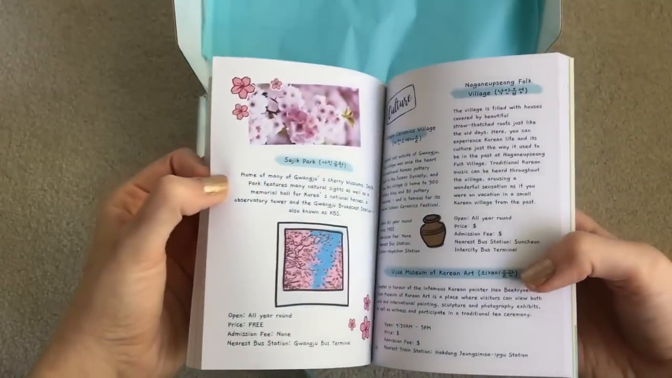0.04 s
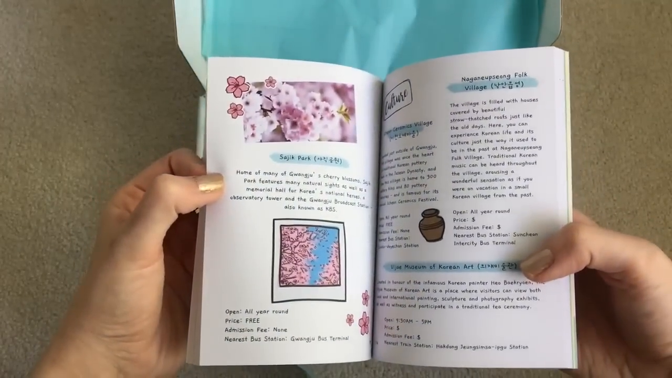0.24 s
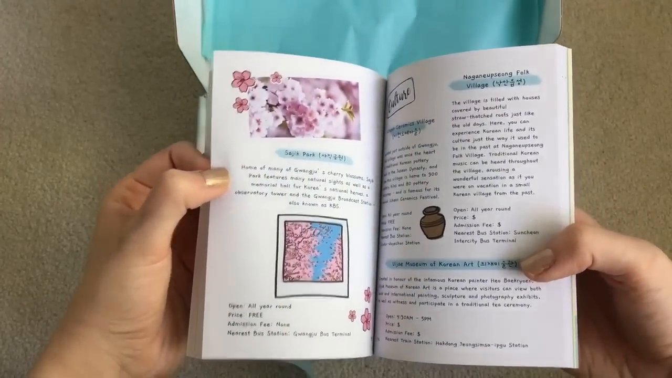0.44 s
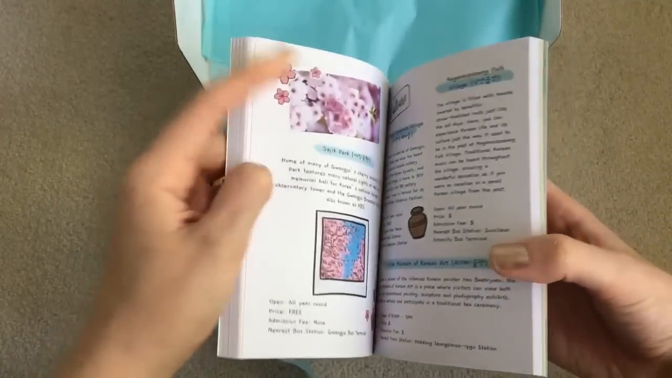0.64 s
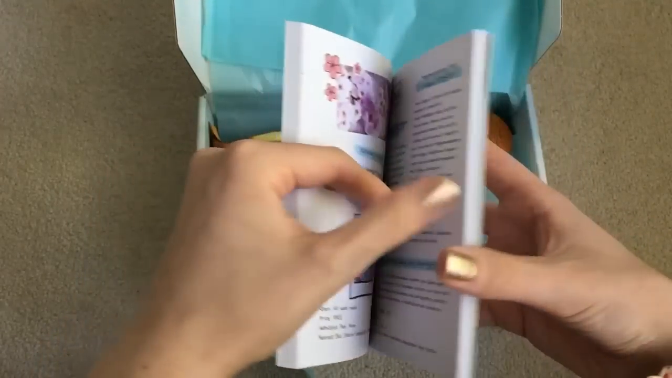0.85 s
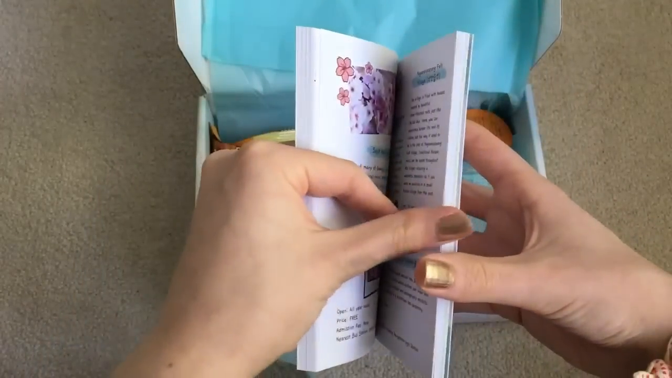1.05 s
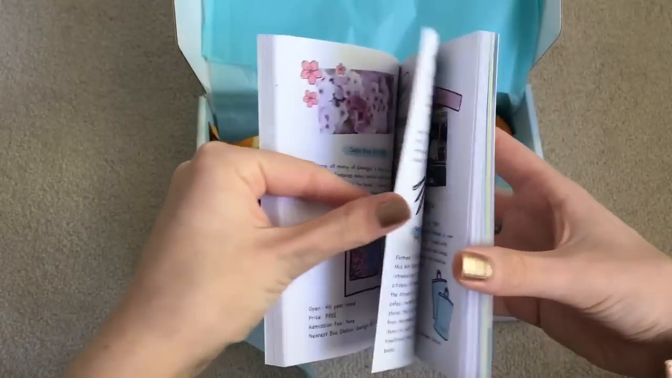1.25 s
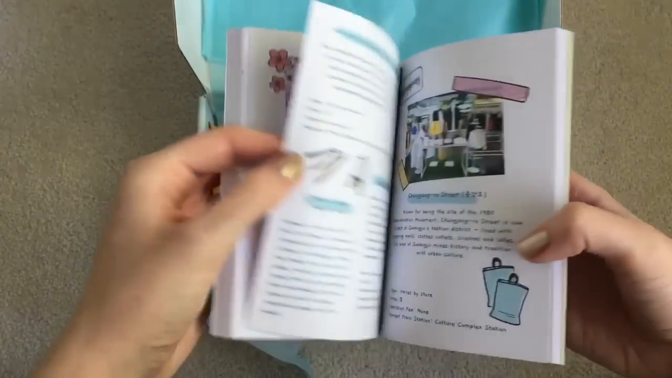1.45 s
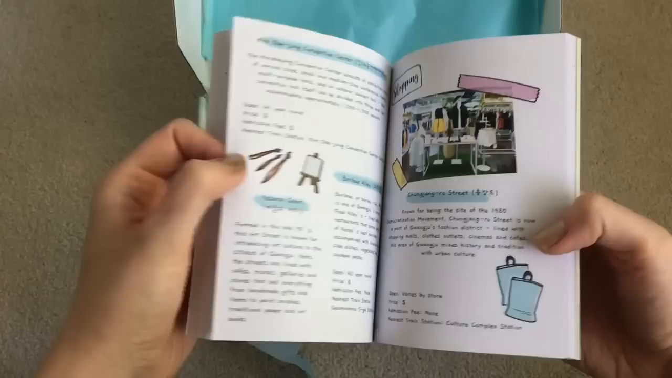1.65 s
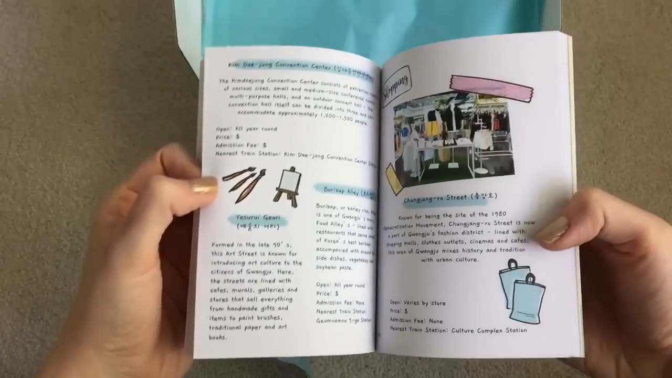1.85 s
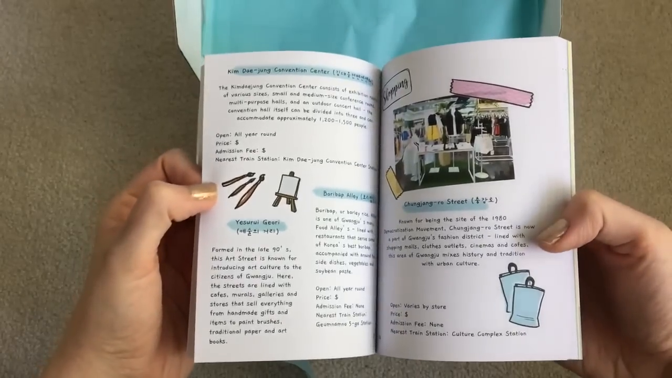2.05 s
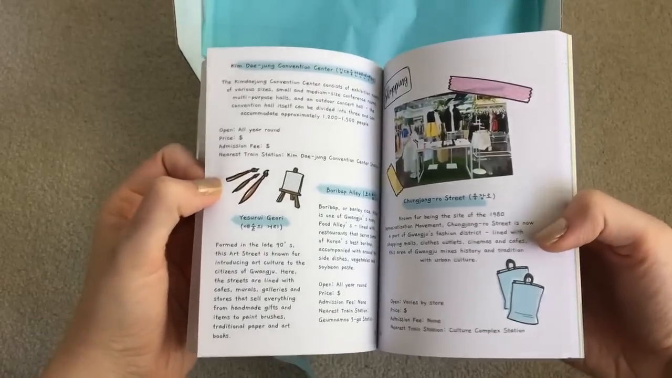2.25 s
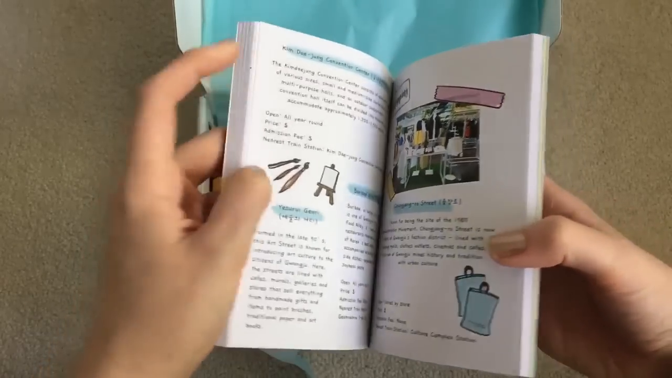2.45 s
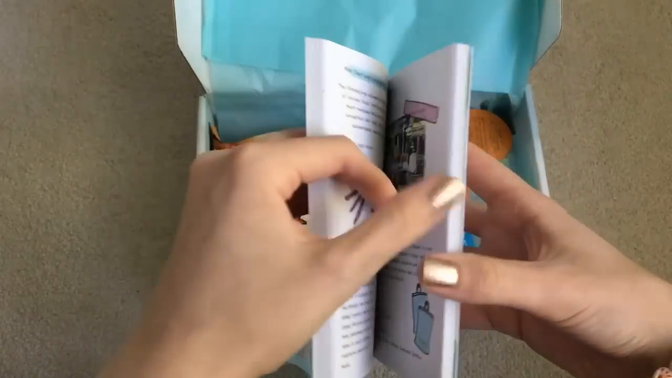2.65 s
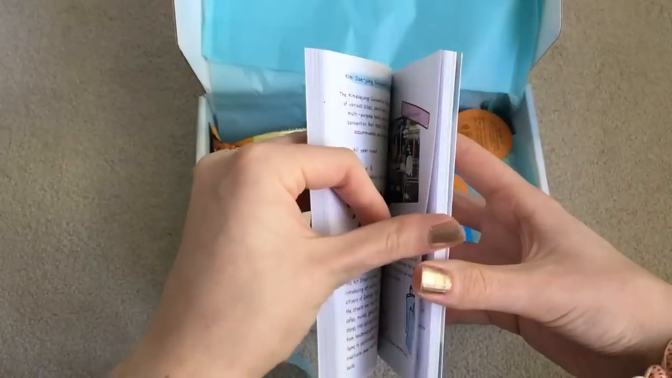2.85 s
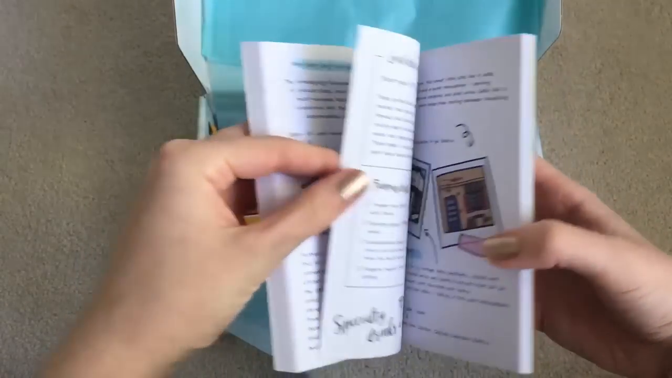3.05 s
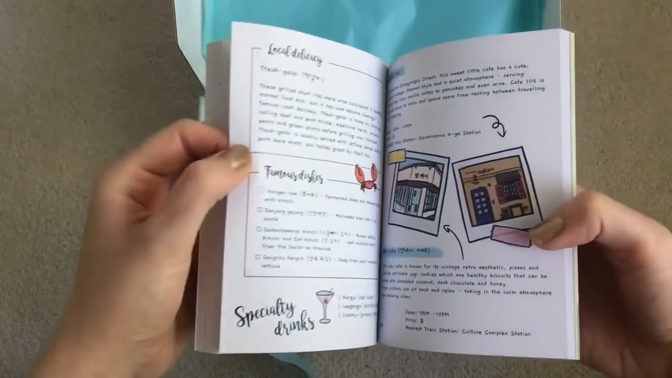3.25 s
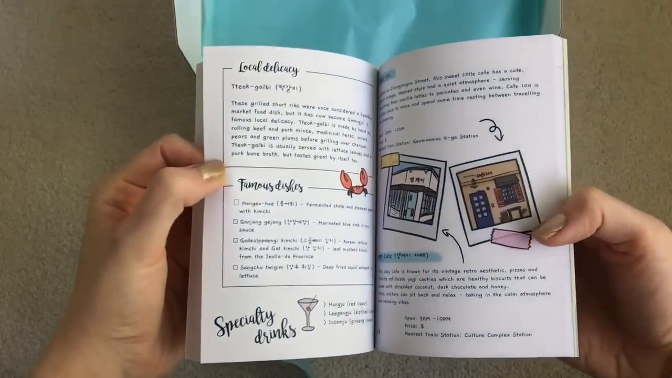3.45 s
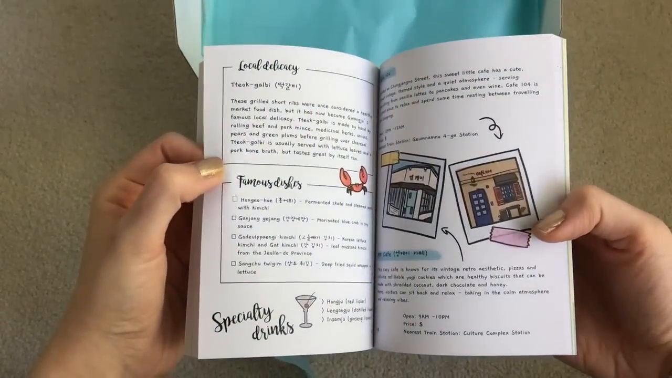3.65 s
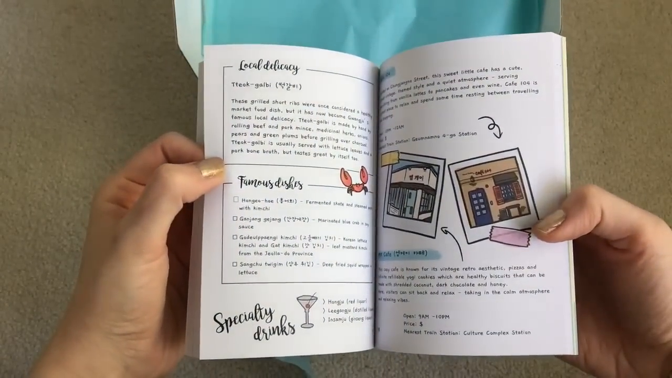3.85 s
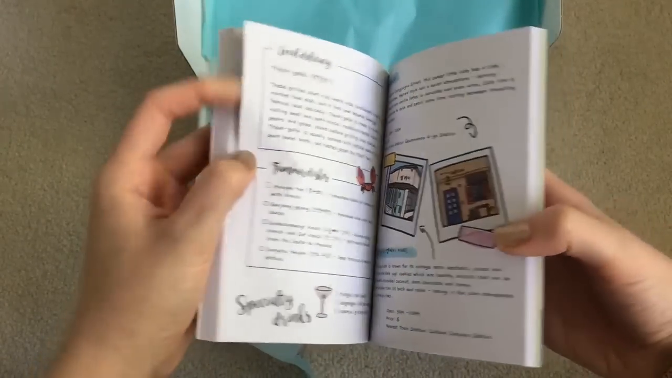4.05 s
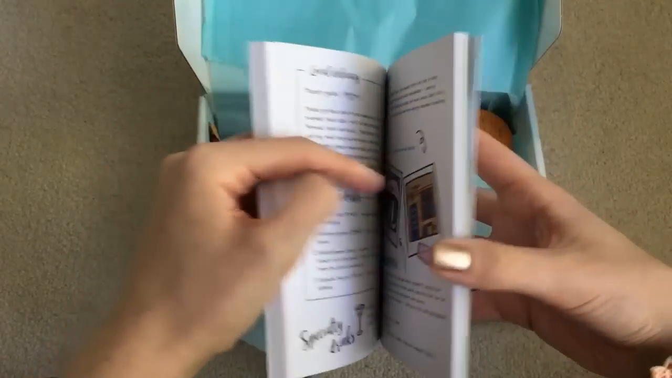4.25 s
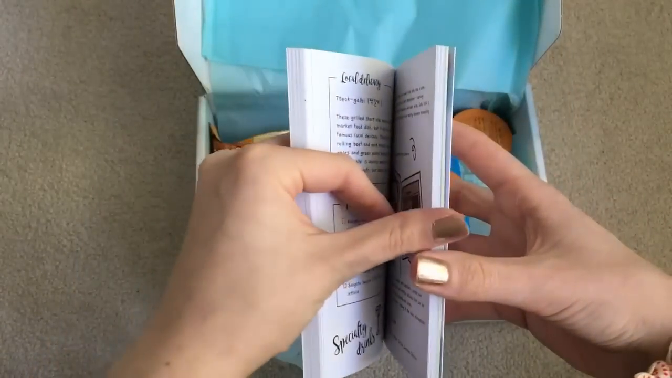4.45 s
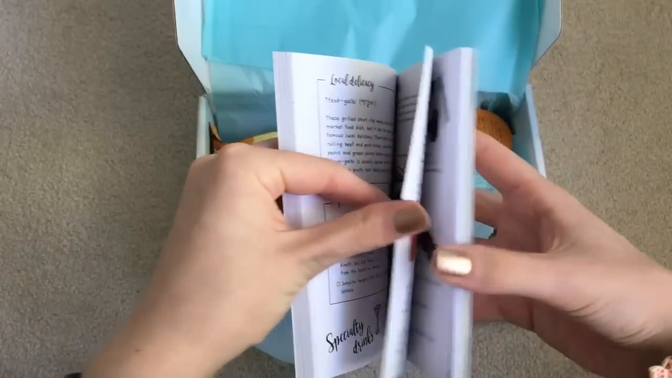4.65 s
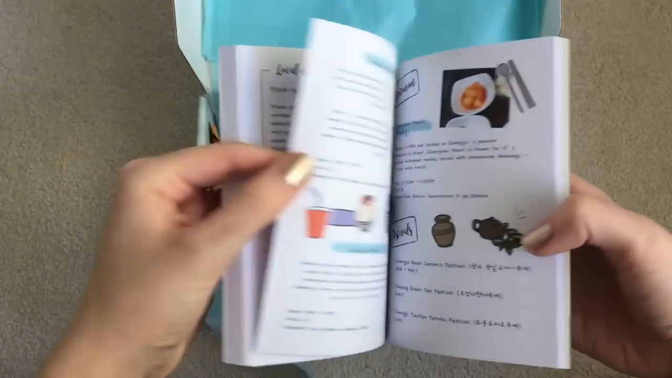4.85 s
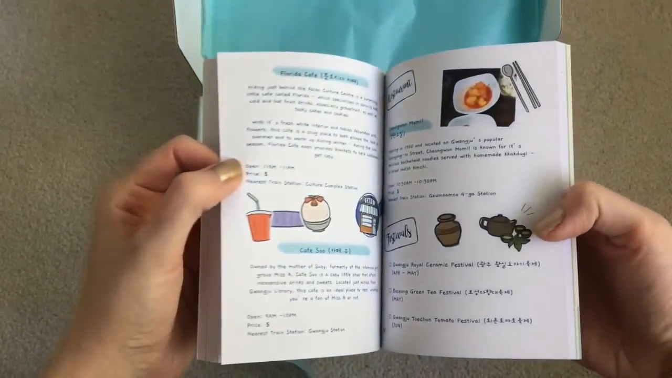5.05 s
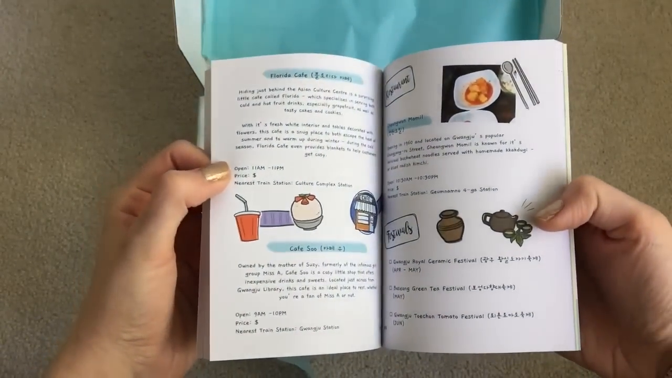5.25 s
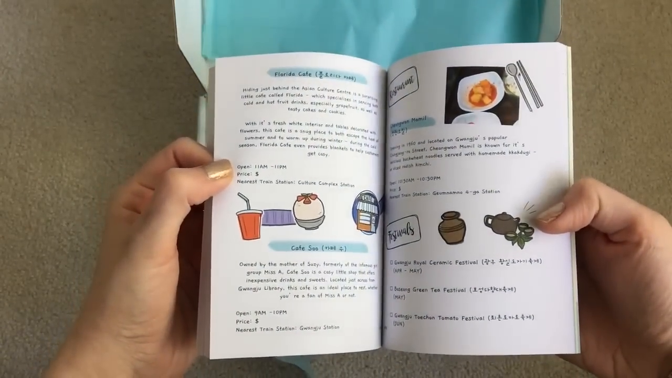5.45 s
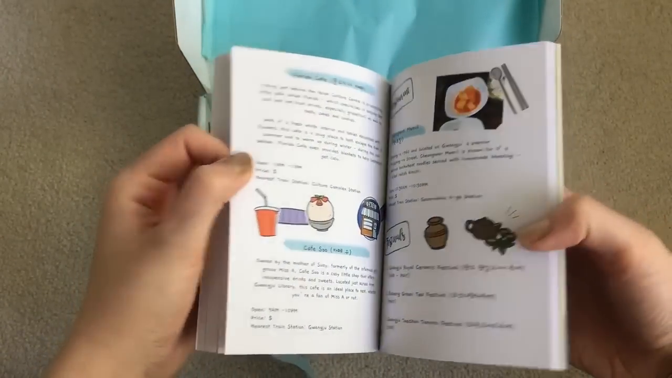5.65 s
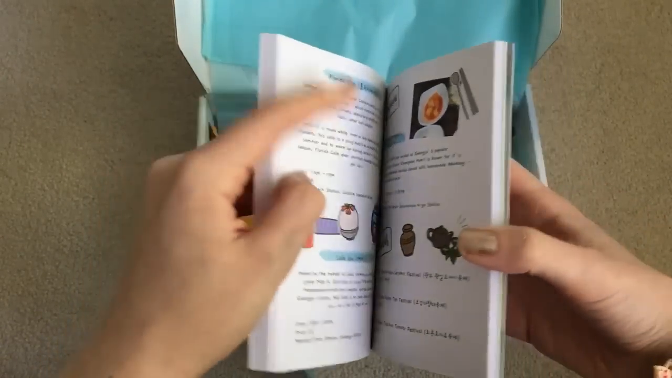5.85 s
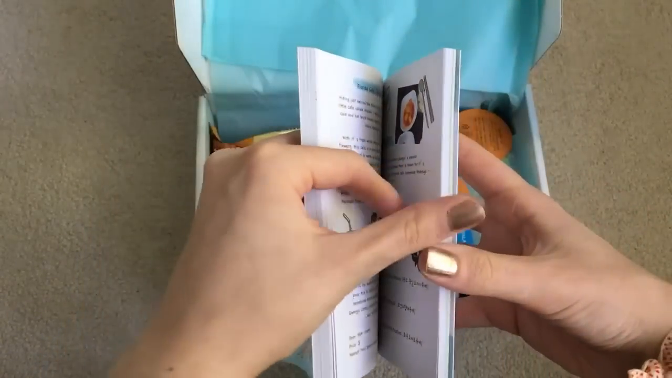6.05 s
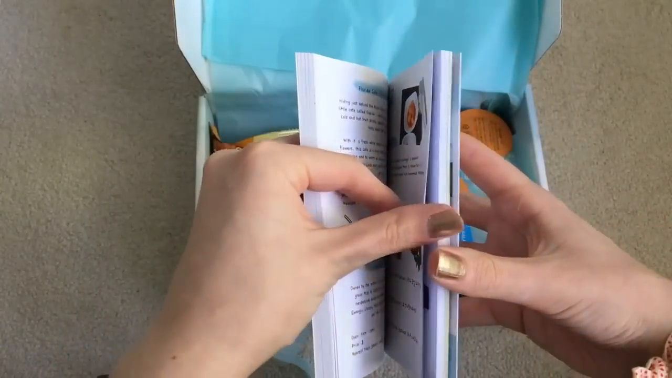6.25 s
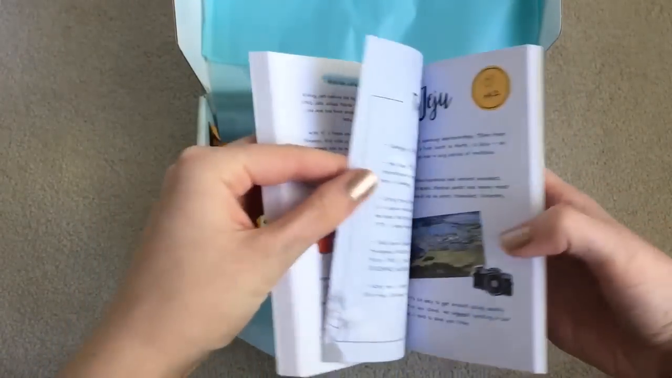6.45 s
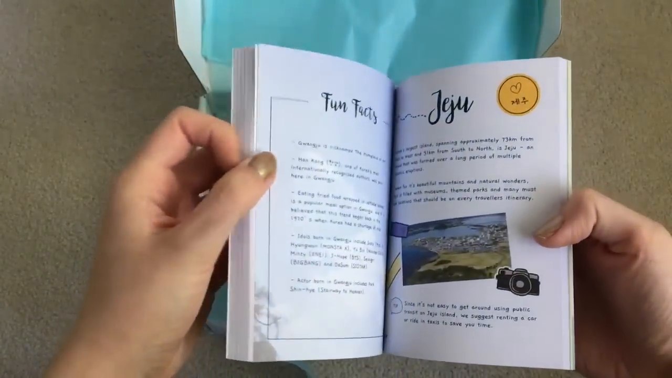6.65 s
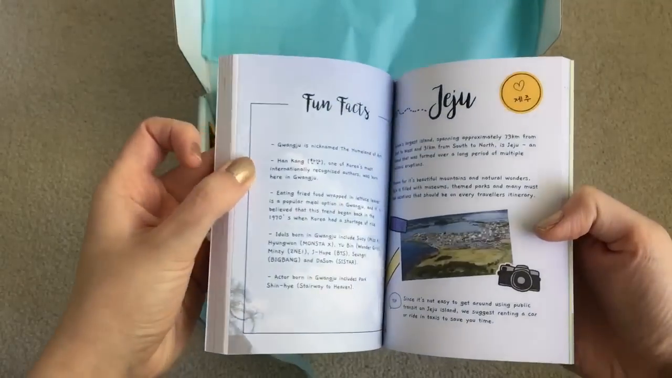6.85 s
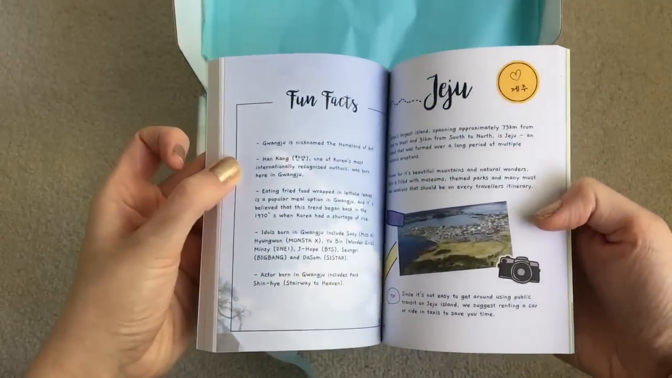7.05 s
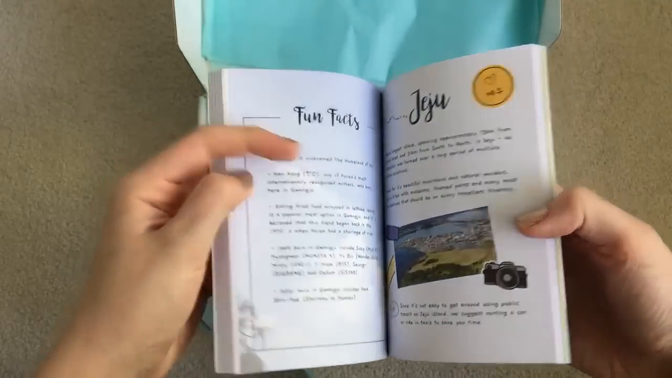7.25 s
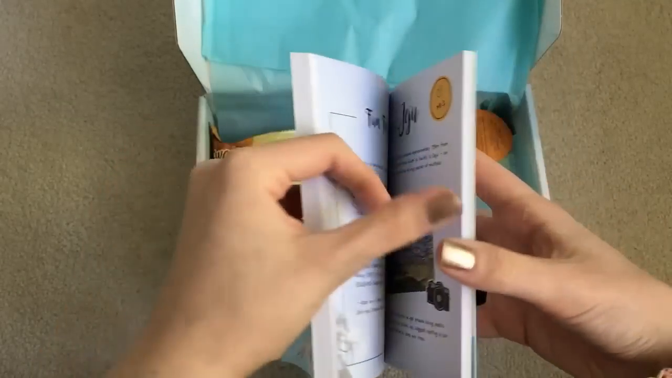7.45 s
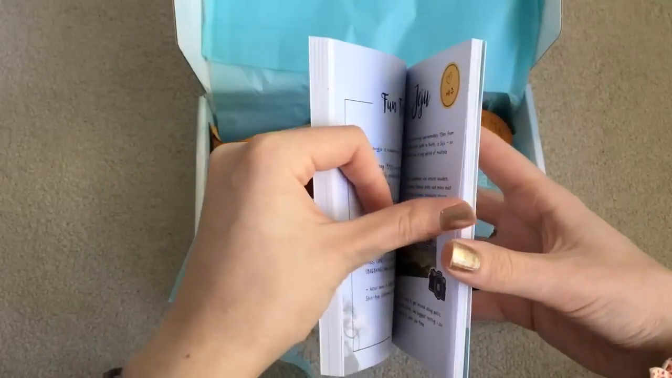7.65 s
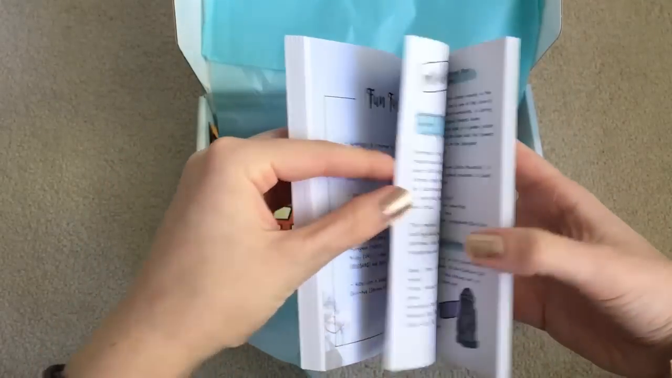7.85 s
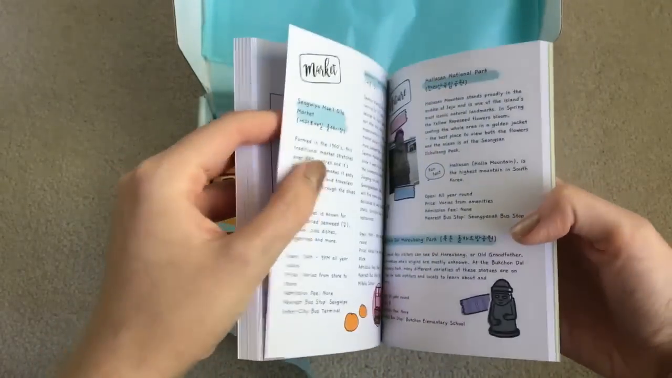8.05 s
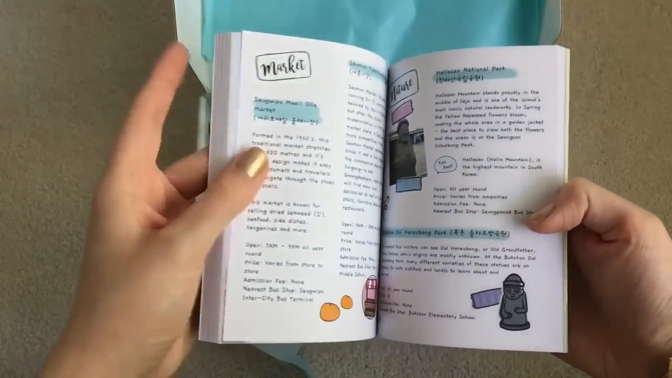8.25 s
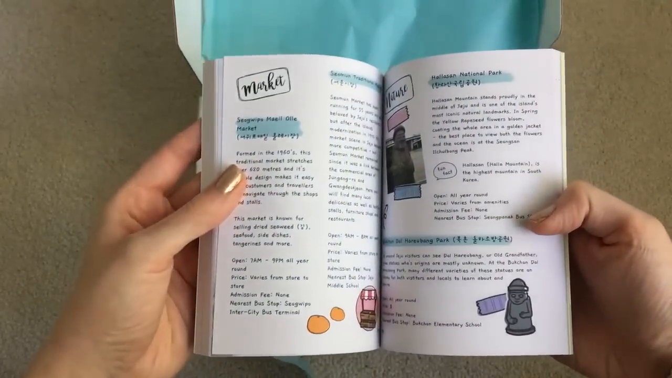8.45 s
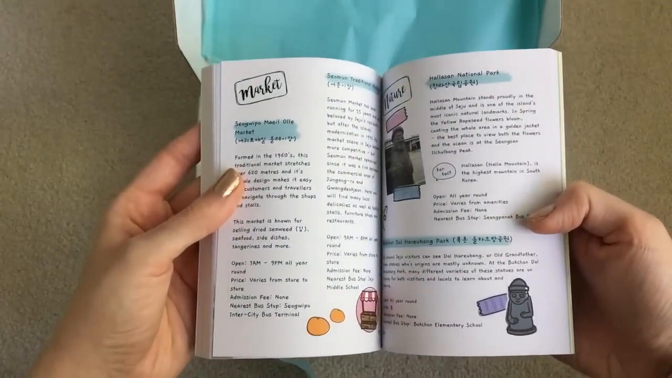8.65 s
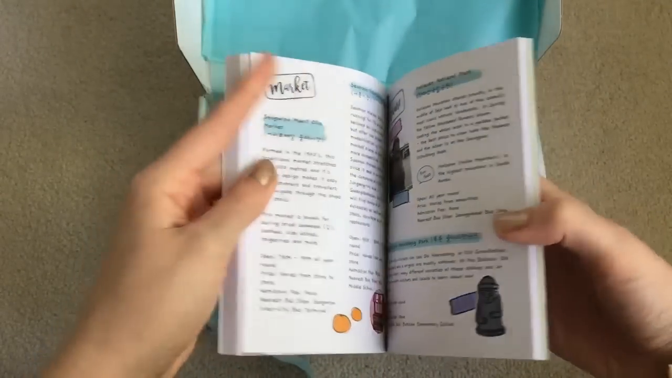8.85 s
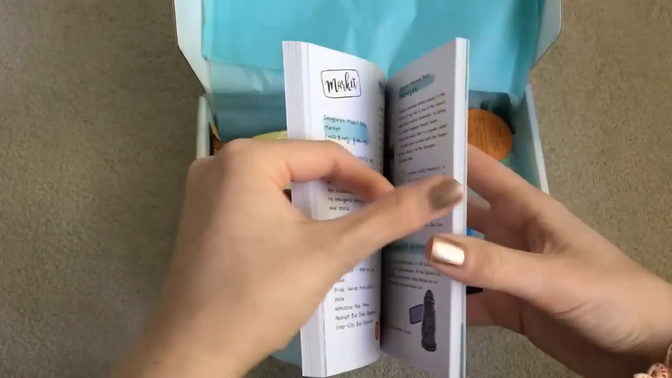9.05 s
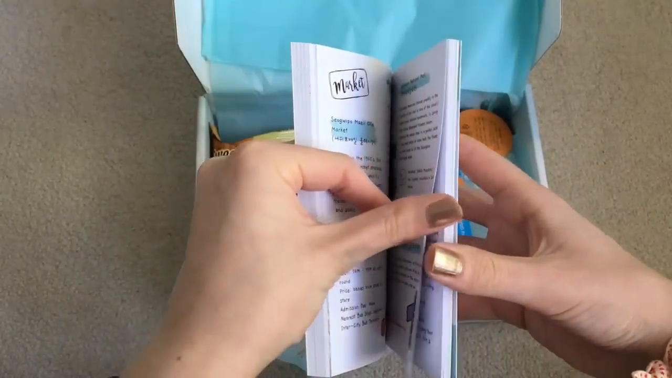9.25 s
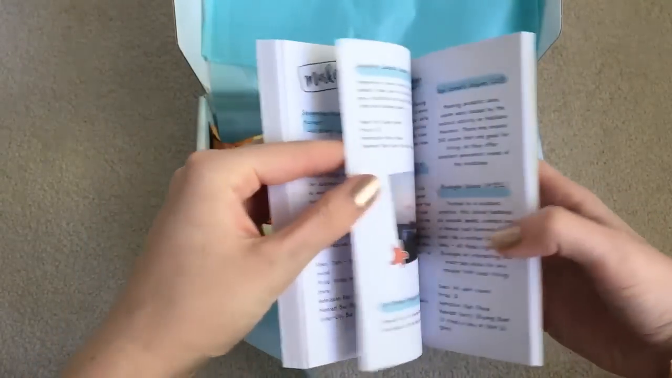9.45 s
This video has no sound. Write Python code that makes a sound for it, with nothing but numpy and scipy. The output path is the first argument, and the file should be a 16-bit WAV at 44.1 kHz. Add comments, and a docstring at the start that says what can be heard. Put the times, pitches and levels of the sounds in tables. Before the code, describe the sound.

In a quiet furnished room, hands flip through a small paperback close to the microphone. Every second or two a thumb slides off the page edges with a short rising scrape, a sheet snaps loose, then rustles down. Tiny crease ticks, soft fingertip pats and dull book thumps fill in. A muffled low swell passes midway, and the faint low hum grows late on.

```python
"""Room tone and a low hum are present from the start; beating sine lines make the hum.
From 0.6 s a thumb slides off a small paperback's pages and sheets drag, by stick-slip friction noise.
Between slides freed sheets snap as damped resonators, creases tick as impulses, the book thumps by its modes.
Near 4.4 s a muffled swell of filtered noise throbs; near 8 s strong snaps sound while the hum is at its fullest.
Light handling fills the gaps, and a short decaying noise tail gives the reverberation."""
import sys
import numpy as np
from scipy import signal
from scipy.fft import rfft, irfft
from scipy.io import wavfile
from scipy.ndimage import map_coordinates

SR = 44100
rng = np.random.default_rng(int(sys.argv[2]) if len(sys.argv) > 2 else 0)


def dump(signal):
    """Clip the signal to [-1, 1] and save it as 16-bit WAV at the path in sys.argv[1]."""
    limited = np.clip(np.atleast_2d(signal).T, -1, 1)
    pcm = np.round(limited * 32767).astype(np.int16)
    wavfile.write(sys.argv[1], SR, pcm)


N = 419391  # length in samples


def undb(db):
    """Level law: amplitude gain is 10 to the power dB/20."""
    return 10 ** (np.asarray(db) / 20)


def unit(x):
    """Normalisation of the mean square: scale to rms 1."""
    return x / np.sqrt(np.mean(x ** 2) + 1e-20)


def curve(rows):
    """Linear interpolation between (t/s, value) rows."""
    return np.interp(np.arange(N) / SR, *np.transpose(rows))


def walk(rate):
    """Slow random modulation: Gaussian knots, rate per second, joined by lines to a spread near 1."""
    knots = rng.standard_normal(4000)
    return 1.206 * np.interp(np.arange(N) / SR * rate, np.arange(len(knots)), knots)


def colour(x, points):
    """Minimum-phase filtering: the folded cepstrum gives a causal response with the (f/Hz, level/dB) spectrum."""
    size = 2 ** 13
    hz, db = np.transpose(points)
    bins_hz = np.arange(size // 2 + 1) * SR / size
    log_gain = np.log(undb(np.interp(np.log(bins_hz + 1), np.log(hz), db)))
    cepstrum = irfft(log_gain)[:size // 2]
    cepstrum[1:] *= 2
    response = irfft(np.exp(rfft(cepstrum, size)))
    return signal.fftconvolve(x, response)[:len(x)]


def band(x, hz, kind, order=3):
    """Band limiting by a maximally flat (Butterworth) filter."""
    sos = signal.butter(order, np.minimum(hz, SR / 2 - 1), kind, fs=SR, output="sos")
    return signal.sosfilt(sos, x)


def resonate(x, hz, width_hz):
    """Damped resonance: a second-order peak whose quality factor is hz / width_hz."""
    return signal.lfilter(*signal.iirpeak(hz, hz / width_hz, fs=SR), x)


def add(out, s, sound):
    """Superposition: mix a sound in at time s."""
    i = int(s * SR)
    out[i:i + len(sound)] += sound[:N - i]


# spectrum of the room tone: (f/Hz, relative level/dB)
ROOM_TONE = [(12, -46), (20, -10.5), (36, -4.5), (60, -3), (216, -22), (367, -22), (558, -30), (780, -30),
             (1060, -31.5), (1480, -33.5), (4810, -40), (16000, -43)]


def room_tone(level_db=-55.76):
    """Stationary broadband noise: white noise shaped by the spectrum of the room."""
    return undb(level_db) * unit(colour(rng.standard_normal(N), ROOM_TONE))


# lines of the low hum: (f/Hz, rms level/dB before HUM_LEVEL is added)
HUM = [(45.2, -71.5), (48.4, -71), (57.5, -73), (85, -69.5)]
# strength of the hum over time: (t/s, gain/dB)
HUM_LEVEL = [(0, 0), (2.5, 3), (7.2, 8), (7.7, 12.5), (8.8, 11.5), (9.5, 1.5)]


def hum(waver_rad=0.97):
    """Beating: neighbouring sine lines with wandering phases interfere."""
    t = np.arange(N) / SR
    lines = 0
    for hz, db in HUM:
        phase = 2 * np.pi * hz * t + waver_rad * walk(6.5)
        lines = lines + undb(db) * np.sqrt(2) * np.sin(phase)
    return lines * undb(curve(HUM_LEVEL))


# hollow resonances within the swell: (f/Hz, width/Hz, relative level/dB)
HOLLOW = [(264.7, 22, -3.5), (360, 20, -4)]
# spectrum of the muffled part: (f/Hz, relative level/dB)
MUFFLED = [(90, -6), (155, -3.5), (215, -4), (300, -4), (450, -6), (600, -24.5), (1200, -33.5)]
# rise and fall of the swell: (t/s, gain/dB)
SWELL = [(3.95, -86), (4.22, -63), (4.38, -55), (4.6, -55), (4.85, -60.5), (5.2, -78.5)]


def muffled_swell(muffled_db=-3):
    """Amplitude-modulated narrow-band noise: two resonances throb over muffled low noise."""
    hollow = 0
    for hz, width_hz, db in HOLLOW:
        throb = resonate(rng.standard_normal(N), hz, width_hz) * undb(3 * walk(18))
        hollow = hollow + undb(db) * unit(throb)
    muffled = undb(muffled_db) * unit(colour(rng.standard_normal(N), MUFFLED))
    return undb(curve(SWELL)) * (hollow + muffled)


def reflections(x, wet_db=-19, t60_s=0.33, damp_hz=5000):
    """Reverberation: a small furnished room answers with a dull, exponentially decaying tail."""
    t = np.arange(SR // 2) / SR
    dull = band(rng.standard_normal(len(t)), damp_hz, "lowpass", order=1)
    tail = dull * undb(-60 * t / t60_s) * (t > .004)
    return undb(wet_db) * signal.fftconvolve(x, tail / np.linalg.norm(tail))[:N]


# modes of the held book: (f/Hz before the pitch ratio, relative level/dB, decay/s)
BOOK = [(81.6, -6.5, 0.022), (143.8, 1, 0.005), (250, -2, 0.004), (376, -13.5, 0.0008)]
# the block of pages lands in the hand: (t/s, level/dB, pitch ratio)
THUMPS = [(0.695, -46.5, 1.06), (1.421, -45, 1.44), (2.508, -35, 1.37), (2.671, -46, 1.5),
          (3.157, -48, 1.36), (4.188, -37, 1.43), (5.842, -37.5, 1.38), (5.998, -48.5, 1.65),
          (8.033, -36, 2.56), (8.067, -33.5, 0.86), (8.068, -38, 2.7), (9.004, -42, 0.77)]


def thumps(flap_db=-10, flap_s=0.0078):
    """Modal decay: the soft block of pages rings briefly and pushes out a puff of air."""
    out, t = np.zeros(N), np.arange(SR // 8) / SR
    for s, db, ratio in THUMPS:
        body = 0
        for hz, mode_db, decay_s in BOOK:
            body = body + undb(mode_db) * np.sin(2 * np.pi * hz * ratio * t) * np.exp(-t / decay_s)
        puff = unit(band(rng.standard_normal(len(t)), [220, 700], "bandpass", order=2))
        add(out, s, undb(db) * (body + undb(flap_db) * puff * np.exp(-t / flap_s)))
    return out


# fixed peaks and dips shared by the hiss, the snaps and the pats: (f/Hz, relative level/dB per Hz)
SHARED_COLOUR = [(250, -11), (650, -14), (930, -0.5), (1120, -4), (1400, -7.5), (2100, -3.5), (2700, -4), (3550, 0),
                 (4850, -9), (5700, -2), (7500, -10.5), (9500, -18), (16000, -33.5)]
# fingertips shift their hold: (t/s, level/dB before pat_db is added)
PATS = [(0.884, -42), (1.361, -44.5), (2.103, -54), (2.202, -56), (5.224, -45), (5.281, -46),
        (6.773, -34.5), (6.812, -42.5), (6.91, -48), (6.978, -52), (7.24, -45.5), (7.294, -46),
        (8.389, -42), (9.267, -48)]


def pats(pat_db=-1, hz=1200, width_hz=1300, decay_s=0.0025):
    """Damped impact: skin meets paper in a short scuff that rings the sheet dully."""
    out, t = np.zeros(N), np.arange(SR // 30) / SR
    for s, db in PATS:
        scuff = colour(rng.standard_normal(len(t)), SHARED_COLOUR)
        ring = unit(resonate(resonate(scuff, hz, width_hz), hz, width_hz))
        add(out, s, undb(db + pat_db) * ring * np.exp(-t / decay_s))
    return out


# spectrum of a buckling crease, for ticks and crackle: (f/Hz, relative level/dB per Hz)
CREASE = [(800, -20), (2500, -8.5), (5000, 2.5), (8500, 7), (10500, 5.5), (13000, 7), (15000, 5),
          (16000, -18)]
# creases and glue tick as the paper bends: (t/s, level/dB before tick_db and CREASE); crackle uses the times
TICKS = [(0.76, -36), (0.834, -27), (.895, -31), (1.087, -35.5), (1.484, -28), (1.939, -39.5), (2.627, -31),
         (2.691, -29.5), (3.424, -39), (3.571, -39.5), (4.295, -33.5), (4.511, -30.5), (5.074, -35),
         (5.945, -32), (5.997, -27), (6.143, -38), (6.19, -35.5), (7.085, -40), (7.561, -27.5),
         (7.6143, -22), (7.631, -30), (7.698, -34.5), (7.774, -33.5), (8.253, -23.5), (8.434, -37.5),
         (8.466, -37), (8.556, -37.5), (8.88, -32), (9.117, -36), (9.17, -37), (9.2016, -27.5),
         (9.212, -33), (9.306, -39.5)]


def ticks(tick_db=1, after_share=0.12, after_s=0.0047):
    """Impulsive buckling: a crease gives one sharp click, followed by smaller ones."""
    out, t = np.zeros(N), np.arange(SR // 30) / SR
    for s, db in TICKS:
        spiky = unit(rng.standard_normal(len(t)) ** 3)
        click = after_share * np.exp(-t / after_s) * spiky
        click[0] = 1
        add(out, s, undb(db + tick_db) * click)
    return colour(out, CREASE)


def crackle(size_db=-49, scatter_db=3.5, spread_s=.05, count=3):
    """Random stress release: around each tick the strained paper lets go in a few fainter ones."""
    out = np.zeros(N)
    for s, _ in TICKS:
        for lag, size in rng.standard_normal((count, 2)):
            add(out, min(s + spread_s * lag, (N - 1) / SR), undb([size_db + scatter_db * size]))
    return colour(out, CREASE)


# a sheet snaps free or slaps its neighbour: (t/s, level/dB, f/Hz, width/Hz per resonator pass, decay/s)
SNAPS = [(.691, -30, 1580, 2500, 0.0024), (1.4838, -11.5, 3680, 750, 0.00039),
         (1.484, -10.5, 5350, 1097, .0003), (1.485, -27.5, 1370, 800, .002),
         (1.509, -30, 1610, 900, 0.0071), (2.4585, -35, 3380, 6000, .0008),
         (2.5062, -26.5, 1360, 1290, 0.0024), (4.1855, -26, 1870, 1870, 0.0045),
         (5.842, -34.5, 1800, 3000, 0.0023), (5.997, -43, 2800, 4000, 0.0068),
         (7.9912, -22, 2400, 2190, 0.00068), (7.9915, -26, 8700, 2000, 0.0034),
         (7.994, -15, 2480, 1080, 0.00073), (8.0212, -21, 1760, 700, 0.0022),
         (8.0343, -21, 1550, 1080, 0.0013), (8.066, -32, 2500, 5000, 0.0013), (8.854, -35, 1050, 600, .003)]
# a dragged sheet catches and skips on with a small flick: (t/s, level/dB, f/Hz)
FLICKS = [(1.434, -33.5, 1620), (2.634, -30.5, 1300), (3.13, -41, 2170), (3.1568, -29, 1780),
          (3.2185, -31, 1890), (3.2248, -30, 1710), (4.1825, -24.5, 1800), (4.8409, -30, 1920),
          (4.915, -32, 1770), (6.531, -27, 2050), (6.549, -33, 2100), (6.5835, -38, 1800),
          (6.593, -27, 1800), (7.933, -43.5, 2600), (8.005, -26, 1900)]
FLICK_WIDTH_HZ, FLICK_DECAY_S = 780, 0.0013


def snaps(rise_s=0.00021, crack_db=-13, lowest_hz=700, kick=5):
    """Impulse response: one kick of release and a brief chatter ring a heavily damped patch of sheet."""
    out, lead = np.zeros(N), SR // 250
    t = (np.arange(SR // 16) - lead) / SR
    flicks = [(*flick, FLICK_WIDTH_HZ, FLICK_DECAY_S) for flick in FLICKS]
    for s, db, hz, width_hz, decay_s in list(SNAPS) + flicks:
        shape = np.exp(np.minimum(t / rise_s, -t / decay_s))
        push = shape * rng.choice([-1, 1], len(t))
        push[lead] = kick  # the instant of release
        patch = unit(resonate(resonate(push, hz, width_hz), hz, width_hz))
        ring = patch + undb(crack_db) * unit(colour(push, SHARED_COLOUR))
        add(out, s - lead / SR, undb(db) * ring * np.sqrt(np.mean(shape ** 2)))
    return band(out, lowest_hz, "highpass", order=2)  # the snaps fade out gently below lowest_hz


# a sheet brushes its neighbour: (centre t/s, level/dB, first f/Hz, last f/Hz, length/s)
BRUSHES = [(0.669, -39, 3500, 3920, 0.045), (0.808, -40, 1030, 933, 0.033), (1.539, -40, 1508, 2495, .07),
           (3.207, -42.5, 1526, 1927, 0.12), (3.222, -43, 5570, 4250, 0.054),
           (3.342, -42, 3320, 3025, 0.049), (4.117, -42.5, 3200, 3700, 0.1), (4.917, -50, 1925, 1602, .12),
           (5.046, -42, 3250, 2660, 0.077), (5.739, -49, 3600, 3630, 0.052),
           (6.584, -39, 1766, 1943, 0.077), (6.612, -44.5, 6930, 4980, 0.14),
           (6.656, -40.5, 3500, 3060, 0.13), (8.852, -48, 1236, 1036, 0.081)]


def brushes(relative_width=0.38):
    """Gliding cavity resonance: the changing wedge of air between two sheets colours their friction noise."""
    out = np.zeros(N)
    for s, db, hz, last_hz, length_s in BRUSHES:
        width_hz = relative_width * hz
        spiky = rng.standard_normal(SR // 2) ** 3
        rub = unit(resonate(resonate(spiky, hz, width_hz), hz, width_hz))
        swell = np.hanning(int(length_s * SR))
        place = np.cumsum(np.geomspace(1, last_hz / hz, len(swell)))  # reading speed sets the pitch
        glide = map_coordinates(rub, [place], mode="mirror")
        add(out, s - length_s / 2, undb(db) * swell * glide)
    return out


def stroke(length_s, change_db, attack_s, release_s):
    """Contact envelope: it builds up, drifts by change_db over its length and decays exponentially."""
    t = np.arange(int((length_s + 7 * release_s) * SR)) / SR
    attack = np.minimum(t / attack_s, 1)
    change = undb(change_db * np.minimum(t / length_s, 1))
    return attack * change * np.exp(-np.maximum(t - length_s, 0) / release_s)


# the hands keep shifting lightly on the paper: (t/s, length/s, first level/dB, fade/dB)
HANDLING = [(0.559, 0.23, -61.5, -4), (0.834, 0.6, -70, -5), (1.615, 0.13, -52, 3.5),
            (1.75, 0.24, -64.5, 10), (2.377, 0.13, -73.5, -22), (2.655, 0.26, -56, 12),
            (2.955, 0.18, -59.5, 8.5), (3.256, 0.32, -61.5, 8.5), (4.04, 0.053, -69, -19.5),
            (4.19, 0.088, -54, 17), (4.42, 0.12, -65.5, -4), (4.653, 0.14, -67.5, -4),
            (5.091, 0.16, -56, 19), (5.84, .26, -57, 2.5), (6.128, 0.16, -68.5, -1.5),
            (6.783, 0.25, -67, 16), (7.206, 0.134, -71, -11), (7.415, 0.25, -66.5, -5.5),
            (7.698, 0.25, -56, 3.5), (8.79, 0.2, -63.5, 0), (9.016, 0.23, -56.5, 11),
            (9.204, 0.19, -72, -12.5)]


def handling(attack_s=0.012, release_s=0.019, judder_db=1.5, sizzle_db=-6):
    """Light friction: a weak contact whose level changes as the grip shifts."""
    for s, length_s, db, fade_db in HANDLING:
        yield s, undb(db) * stroke(length_s, -fade_db, attack_s, release_s), judder_db, sizzle_db


# fingers pick up a sheet or it settles on the pile:
# (t/s, length/s, peak level/dB, judder level/dB, sizzle level/dB), the last two relative to the hiss
WIPES = [(.79, 0.082, -38, 0.5, -9), (0.914, 0.062, -58, 6.5, -3.5), (1.189, 0.081, -58, 3, 6.5),
         (1.725, 0.052, -40, -9, -28), (2.519, 0.026, -49, -4, 7), (2.596, 0.099, -40.5, 0, -15),
         (2.706, 0.068, -51.5, -2, -12), (3.016, 0.056, -54, 7, -9), (3.121, 0.06, -56, 11.5, -14),
         (3.32, 0.061, -49.5, -10, 8), (3.52, 0.087, -69.5, 13.5, -3), (4.271, 0.11, -40, -1.5, -13),
         (4.371, 0.11, -53, 2, -19), (4.992, 0.13, -44, -6, -1), (5.874, 0.024, -47, 1, -3),
         (6.38, 0.1, -57.5, 6.5, -8), (7.341, 0.12, -53, 4.5, 7.5), (9.141, 0.084, -53, -7, -1),
         (9.462, 0.097, -60, 6, -10)]


def wipes(peak_share=0.26):
    """Pressure-controlled friction: pressure rises quickly and falls more slowly."""
    for s, length_s, db, judder_db, sizzle_db in WIPES:
        progress = np.arange(int(length_s * SR)) / (length_s * SR)
        angle = np.interp(progress, [0, peak_share, 1], [0, np.pi / 2, np.pi])
        yield s, undb(db) * np.sin(angle) ** 2.17, judder_db, sizzle_db


# a sheet drags across its neighbour: (t/s, length/s, first level/dB, fade/dB,
# first judder level/dB, sizzle level/dB), the last two relative to the hiss
DRAGS = [(1.393, 0.062, -45, 1.5, 2, -22), (1.498, 0.12, -37.5, 7, 0.5, -1.5),
         (3.142, 0.064, -48, 2.5, 7, -6), (3.197, 0.081, -43, 3, -0.5, 1), (4.789, 0.25, -50, 1, 7, -8.5),
         (5.713, 0.049, -47.5, 4, -23, -1), (6.466, 0.074, -59, -7, 8, -10), (6.523, 0.086, -42, 5, 8, -3),
         (6.584, 0.18, -45, 0.5, 0, 3.5), (7.96, 0.039, -41, 5, 3.5, 1), (7.988, 0.052, -39.5, 4, 9, 3),
         (8.028, 0.15, -43, 14, -28, 2), (8.265, 0.059, -56, -3, 6, 2)]


def drags(attack_s=0.00894, release_s=0.0073, relax_db_per_s=23):
    """Relaxing stick-slip: the judder dies away as the bent sheet straightens."""
    for s, length_s, db, fade_db, judder_db, sizzle_db in DRAGS:
        hiss = undb(db) * stroke(length_s, -fade_db, attack_s, release_s)
        yield s, hiss, judder_db - relax_db_per_s * np.arange(len(hiss)) / SR, sizzle_db


# the thumb slides off the block of pages: (t/s, length/s, final level/dB, growth/dB,
# judder level/dB, sizzle level/dB), the last two relative to the hiss
THUMB_SLIDES = [(0.602, 0.087, -38, 9, -10.5, 8), (1.443, 0.044, -33.5, 31, 0.5, 3.5),
                (2.451, 0.057, -34.5, 12.5, -14, 2.5), (4.083, 0.102, -39, 5, -10, 8),
                (5.771, 0.068, -38, 17.5, -7, -1), (5.937, 0.08, -41.5, 18, -15, -4.5),
                (8.158, 0.098, -42, 16, -5.5, 7.5), (8.811, 0.073, -52.5, 21, 0, 6),
                (8.928, 0.087, -45.5, 18, 2.5, 4)]


def thumb_slides(attack_s=0.0088, release_s=.004):
    """Loaded friction: the thumb slides with changing force, mostly ever harder, then lets go."""
    for s, length_s, db, growth_db, judder_db, sizzle_db in THUMB_SLIDES:
        hiss = undb(db - growth_db) * stroke(length_s, growth_db, attack_s, release_s)
        yield s, hiss, judder_db, sizzle_db


def contacts():
    """Addition of powers: independent contacts sum to the strengths of hiss, judder and sizzle."""
    power = np.zeros((3, N))
    for s, hiss, judder_db, sizzle_db in [*thumb_slides(), *drags(), *wipes(), *handling()]:
        for layer, db in zip(power, (0, judder_db, sizzle_db)):
            add(layer, s, (hiss * undb(db)) ** 2)
    return np.sqrt(power)


def slips(rate, scatter_db, smooth):
    """Stick-slip: fibres let go at random, rate per second, in uneven pulses over a share of even friction."""
    happens = rng.random(N) < rate / SR
    spread = np.clip(rng.standard_normal(N), -2, 2)
    sizes = undb(scatter_db * spread) * rng.choice([-1, 1], N)
    return unit(unit(happens * sizes) + smooth * rng.standard_normal(N))


def drift(x, depth, rate):
    """Bending stiffness: the resonances of a sheet rise and fall as it bends."""
    place = np.cumsum(np.exp(depth * walk(rate)))
    return map_coordinates(x, [place], order=3, mode="mirror")


def sheet_echo(x, lag_s, share, turn_rate):
    """Comb interference: the facing page reflects the sound from a distance that swings with the sheet."""
    i = np.arange(N)
    lag = lag_s * SR * np.exp(.5 * walk(turn_rate))
    return (x + share * np.interp(i - lag, i, x)) / np.sqrt(1 + share ** 2)


# patches of paper rung by gritty catches: (f/Hz, width/Hz, relative level/dB)
GRIT = [(1900, 1700, 0), (4300, 1300, 2.5), (8000, 4500, 2)]


def grit(grit_db=-9):
    """Sparse impulsive excitation: now and then a coarse fibre lets go with a tiny crack."""
    cracks = 0
    for hz, width_hz, db in GRIT:
        catches = slips(rate=100, scatter_db=4, smooth=0)
        cracks = cracks + undb(db) * unit(resonate(catches, hz, width_hz))
    return undb(grit_db) * unit(cracks)


# spectrum of a juddering sheet: (f/Hz, relative level/dB per Hz)
JUDDER = [(550, -35), (1100, -7.5), (1300, -1), (1870, -4), (2400, -0.5), (3100, -33), (6000, -34.5)]
# spectrum of the cut edges: (f/Hz, relative level/dB per Hz)
EDGE = [(4500, -24), (7600, -7.5), (8700, 5), (9800, 2), (10700, -5), (13500, -0.5), (16000, -15.5)]


def sliding(hiss_db=-1, judder_db=-1.5, sizzle_db=-9.1):
    """Friction noise: countless fine slips hiss, coarse slips shake the whole sheet, the cut edges sizzle."""
    fine = slips(rate=6000, scatter_db=3.5, smooth=.9)
    coarse = slips(rate=600, scatter_db=2.5, smooth=.55)
    rub, shake, edge = contacts()
    # a light touch catches and loses contact and hardly shakes the sheet; a firm one slides more evenly
    light = np.interp(20 * np.log10(rub + 1e-9), [-58, -44], [1, 0])
    texture = undb(walk(200) + (.5 + 2 * light) * walk(55))
    flutter_db = 1.8 * walk(70) - 2 * light
    hiss = rub * undb(hiss_db) * unit(drift(colour(fine, SHARED_COLOUR), depth=.045, rate=22))
    shaken = unit(drift(colour(coarse, JUDDER), depth=.07, rate=30))
    judder = shake * undb(judder_db + flutter_db) * shaken
    sizzle = edge * undb(sizzle_db) * unit(colour(fine, EDGE))
    friction = hiss + judder + sizzle + rub * grit()
    return sheet_echo(friction, lag_s=0.000477, share=0.35, turn_rate=12) * texture


def scene():
    """Superposition: the book, its reverberation and the background add linearly."""
    background = room_tone() + hum() + muffled_swell()
    book = thumps() + pats() + ticks() + crackle() + snaps() + brushes() + sliding()
    return (background + reflections(book) + book)[None]


def record(dry, lowest_hz=31, top_hz=16200):
    """Band limitation: the recorder cuts the deepest bass and, steeply, the top."""
    thinned = band(dry, lowest_hz, "highpass", order=5)
    return signal.sosfilt(signal.ellip(8, .2, 70, top_hz, fs=SR, output="sos"), thinned)


dry = scene()
out = record(dry)
dump(out)
```